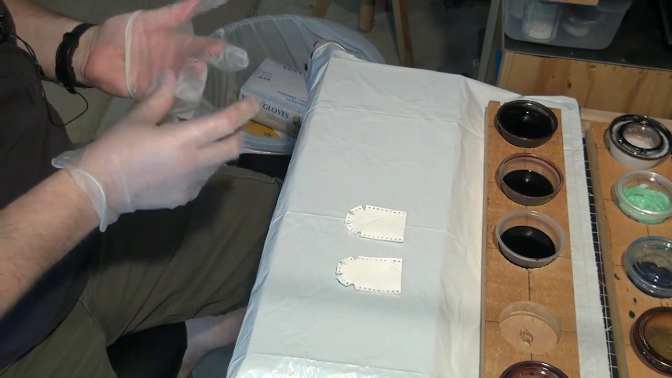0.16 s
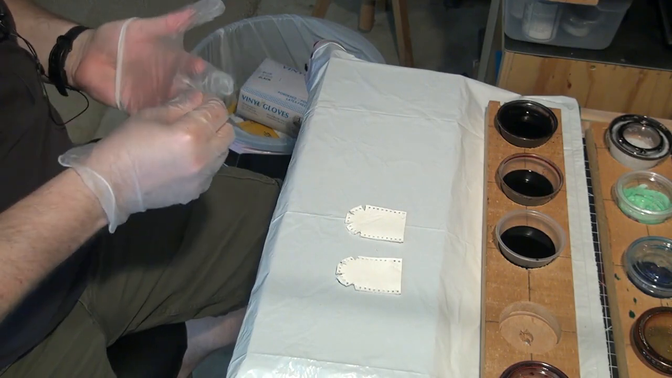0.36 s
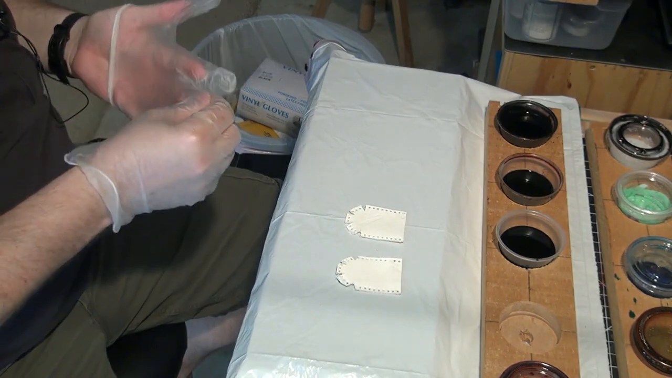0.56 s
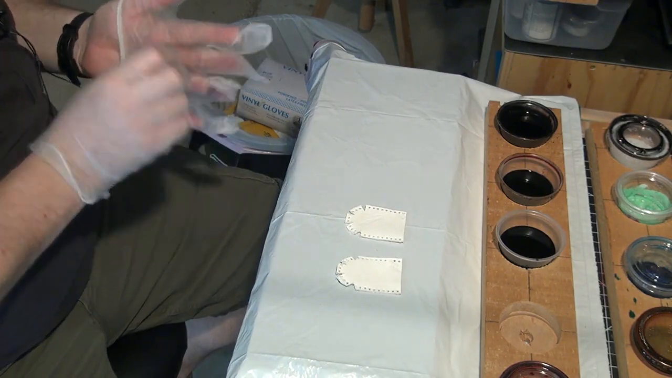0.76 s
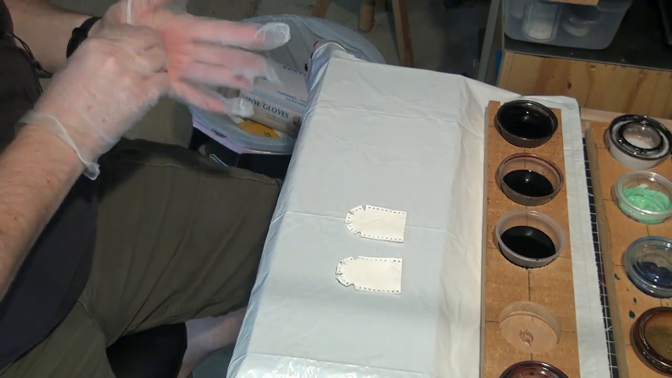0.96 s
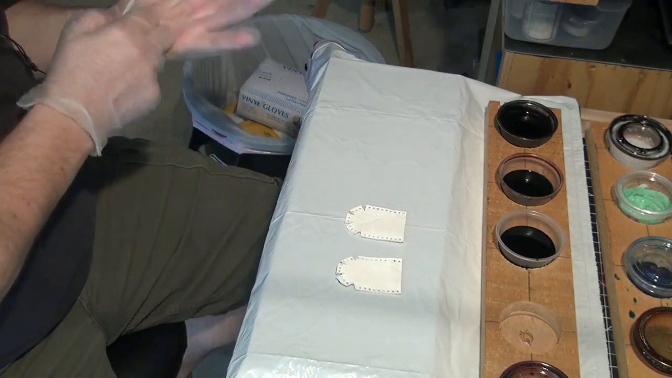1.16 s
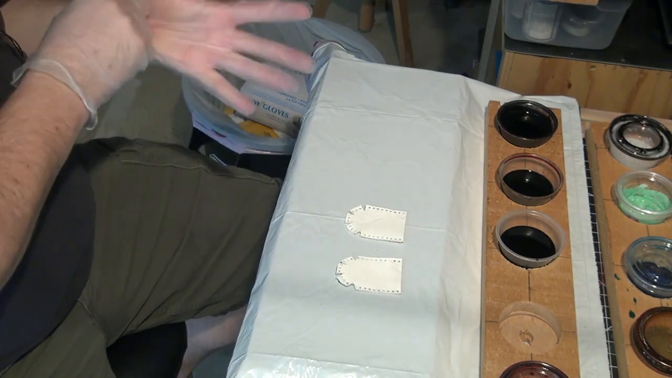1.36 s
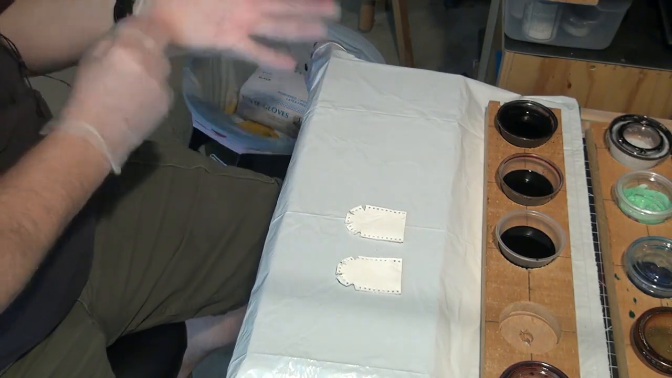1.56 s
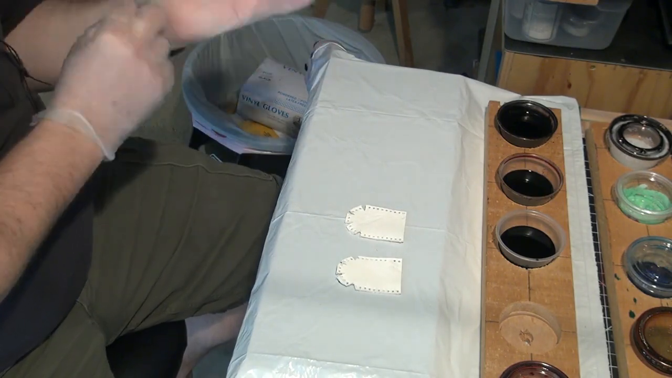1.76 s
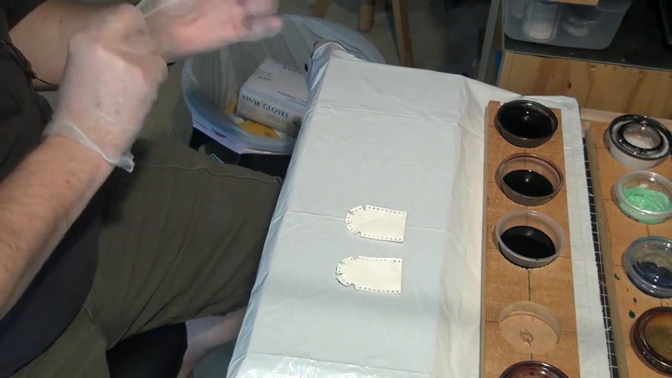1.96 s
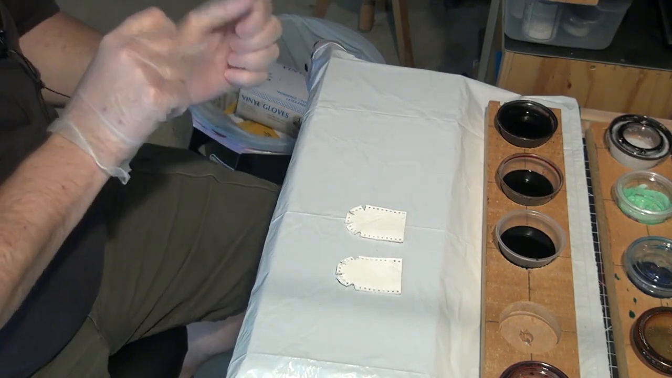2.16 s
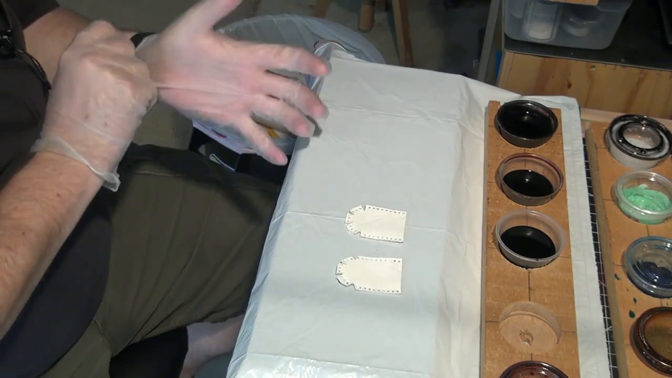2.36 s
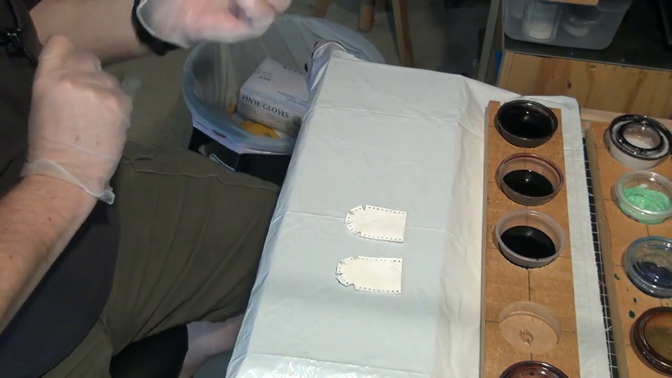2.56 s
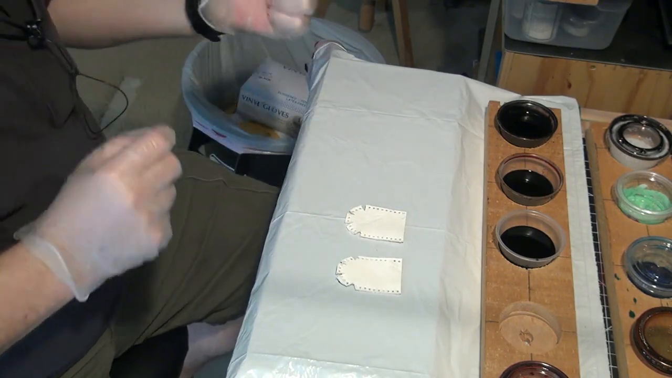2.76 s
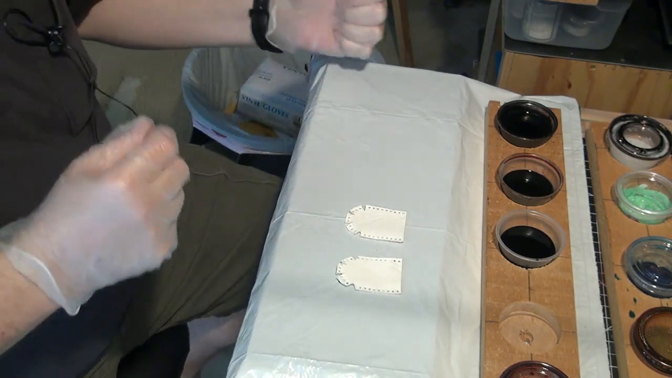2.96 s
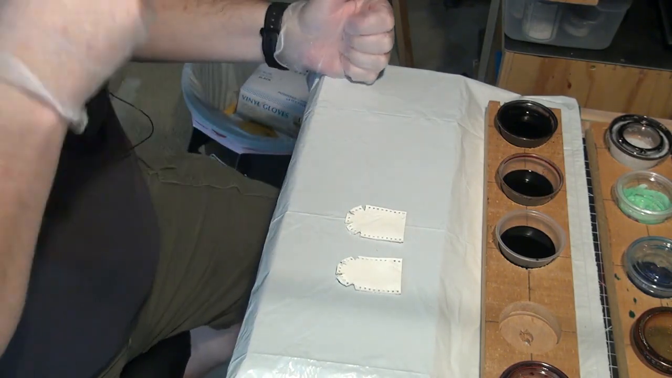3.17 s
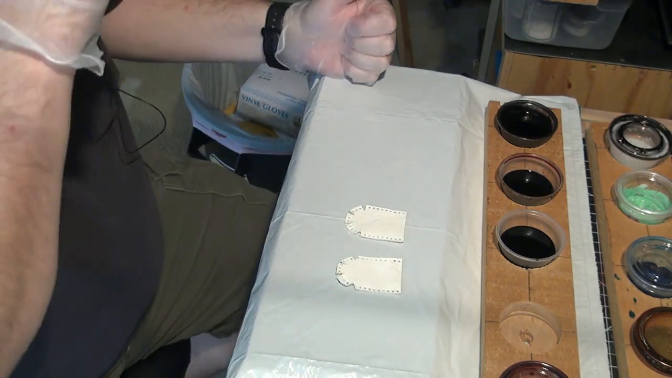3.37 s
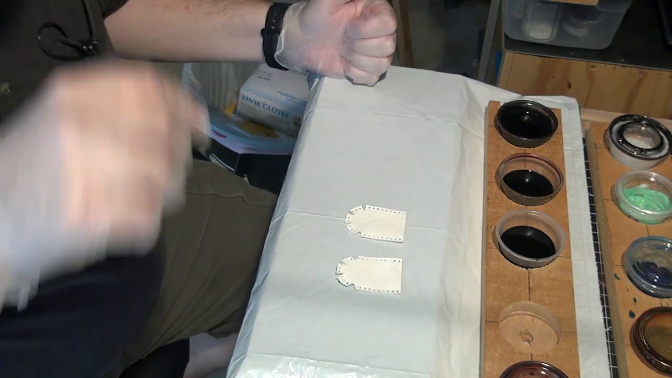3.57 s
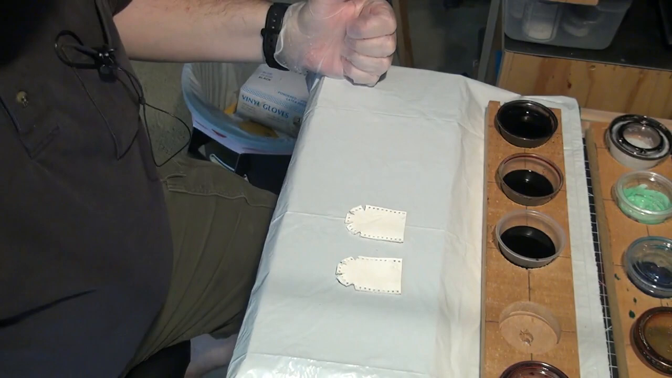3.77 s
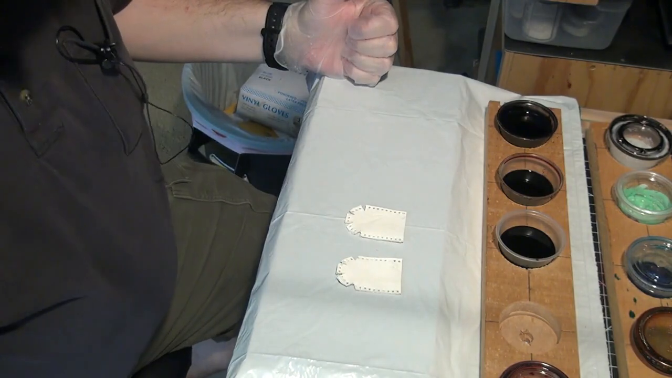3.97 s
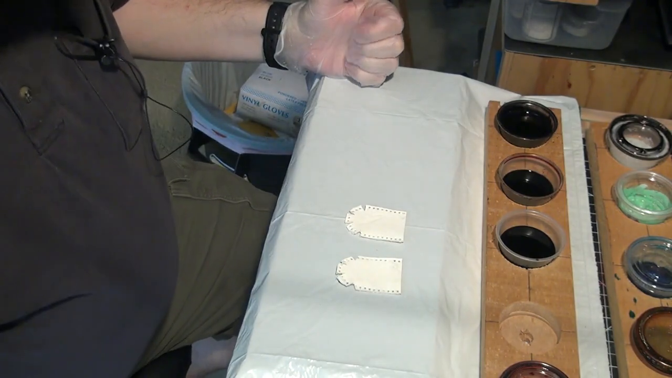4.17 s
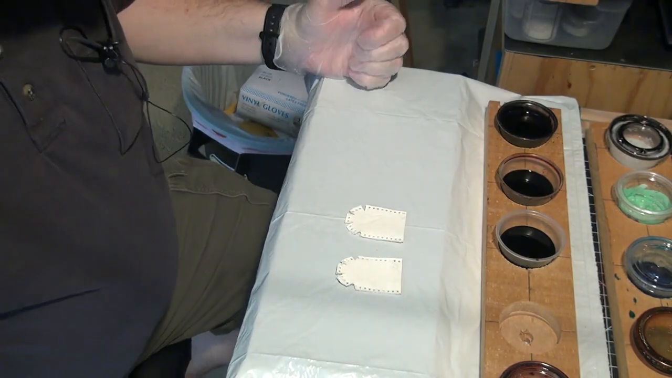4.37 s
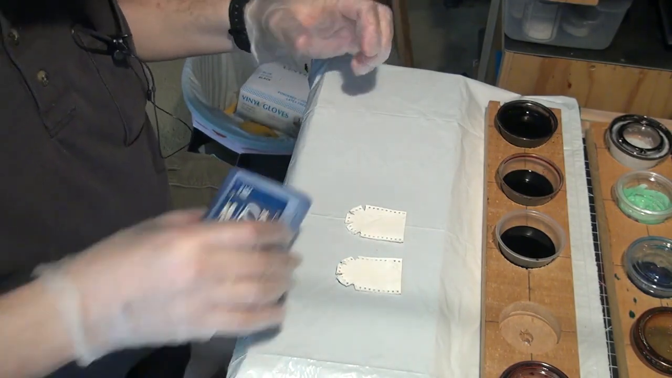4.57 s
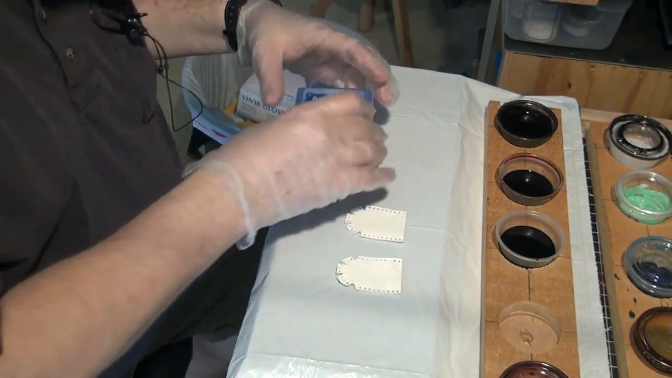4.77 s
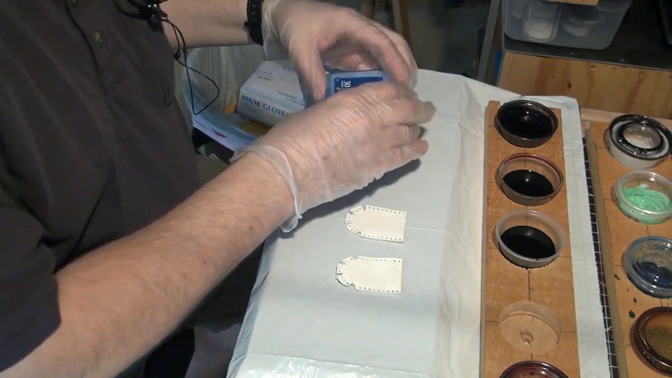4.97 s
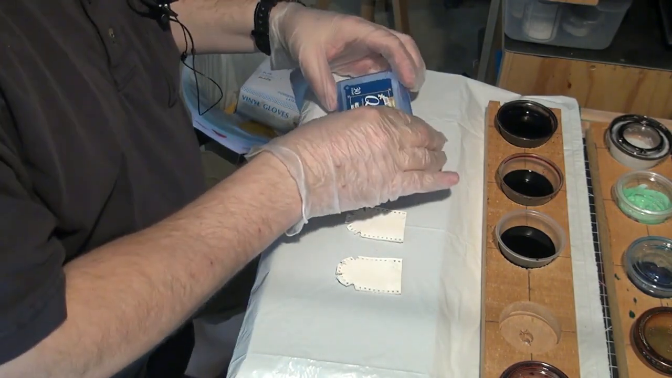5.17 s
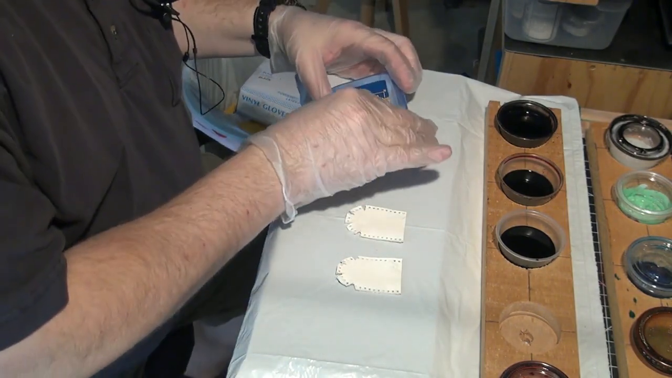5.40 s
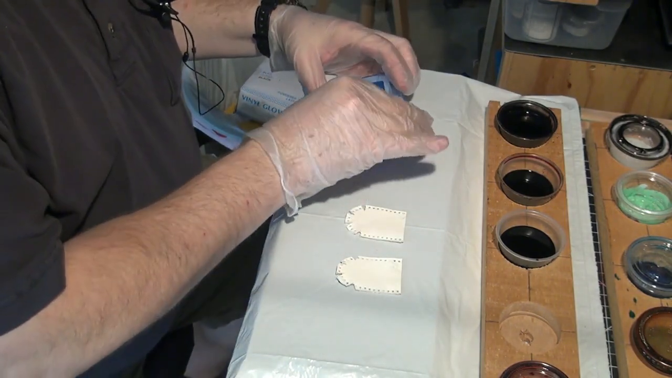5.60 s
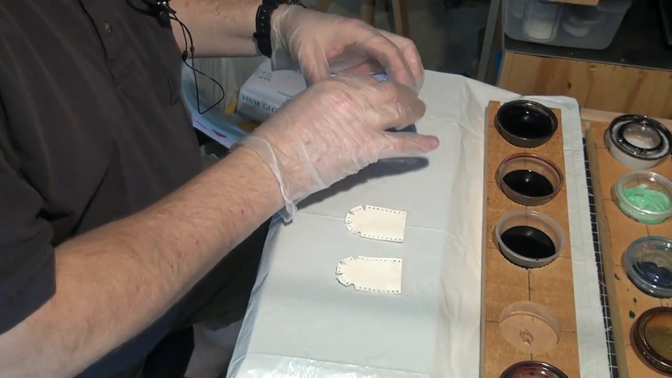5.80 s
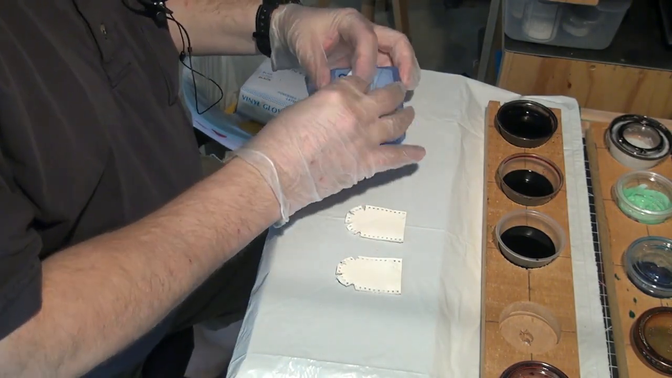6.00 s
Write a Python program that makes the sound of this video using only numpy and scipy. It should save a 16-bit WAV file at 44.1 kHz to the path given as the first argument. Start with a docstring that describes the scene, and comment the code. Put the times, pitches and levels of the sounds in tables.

```python
"""In a quiet workshop, at a bench close to a small microphone, thin vinyl gloves are pulled on: sliding
friction makes filtered noise, slips swell it, and creases and the snapping cuff excite short resonances.
A small carton is then fetched, set down, rattled, knocks a glass jar and has its lid cracked open: blows
strike decaying modes and add bursts of noise. A short room tail and the shop's steady noise and hum,
shaped random noise, lie around it."""
import sys
import numpy as np
from scipy import signal
from scipy.fft import rfft, irfft
from scipy.io import wavfile
from scipy.ndimage import uniform_filter1d

SR = 44100
rng = np.random.default_rng(int(sys.argv[2]) if len(sys.argv) > 2 else 0)


def decibels_to_gain(level_db):
    """Convert a level in decibels to a linear amplitude gain (20 dB per decade)."""
    exponent = np.asarray(level_db, float) / 20
    return 10 ** exponent


def wav_record(signal):
    """Record a signal, one row per channel, as 16-bit PCM in the file named by sys.argv[1]."""
    frames = np.transpose(np.atleast_2d(signal))
    bounded = np.clip(frames, -1, 1)
    # unit amplitude maps onto the largest positive 16-bit level
    quanta = np.round(bounded * 32767).astype(np.int16)
    wavfile.write(sys.argv[1], SR, quanta)


N = 266364  # length [samples]


def colour(x, points):
    """Minimum-phase filtering: a folded cepstrum makes (frequency [Hz], gain [dB]) points causal."""
    hz, db = np.transpose(points)
    log_hz = np.log(np.linspace(1, SR / 2, 2049))
    cepstrum = irfft(np.interp(log_hz, np.log(hz), db) * np.log(10) / 20)
    cepstrum[1:2048] *= 2
    cepstrum[2049:] = 0
    response = irfft(np.exp(rfft(cepstrum)))[:2048]
    return signal.fftconvolve(x, response)[:len(x)]


def unit(x):
    """Normalisation: equal power, rms 1."""
    return x / np.sqrt(np.mean(x ** 2))


def peak(x, db):
    """Normalisation: the largest excursion is set to a peak level."""
    return x * decibels_to_gain(db) / np.abs(x).max()


def band(x, hz, width_hz):
    """Resonance: a second-order peak with gain 1 at its centre."""
    centre, q = min(hz, 0.45 * SR), max(hz / width_hz, 0.3)
    return signal.lfilter(*signal.iirpeak(centre, q, fs=SR), x)


def ring(x, hz, t60):
    """Free vibration: a mode driven by x decays by 60 dB in t60 seconds."""
    pole = np.exp(2j * np.pi * hz / SR - np.log(1000) / (t60 * SR))
    return signal.lfilter([1], [1, -pole], x).imag


def walk(rate):
    """Slow fluctuation: random levels of rms 1, held 1 / rate seconds and slewed twice."""
    hold = int(SR / rate)
    levels = np.repeat(rng.standard_normal(N // hold + 1), hold)
    return unit(uniform_filter1d(uniform_filter1d(levels, hold), hold)[:N])


def add(out, s, x):
    """Superposition: mix x into out from time s [s] on."""
    i = max(int(s * SR), 0)
    out[i:i + len(x)] += x[:N - i]


# film and sleeves sliding, slack film dull and stretched film bright:
# (time [s], level [dB], tautness [dB])
SLIDING = [(0, -46, 0.5), (0.08, -62.5, -2.5), (0.25, -59.5, 0), (0.33, -54.5, -1), (0.5, -53, -9.5),
           (0.64, -50, -2), (0.72, -57.5, -3.5), (0.82, -60.5, -1.5), (1.0, -55, 6.5), (1.051, -42.5, 5),
           (1.14, -44.5, -3), (1.4, -42.5, 2), (1.62, -45, -2), (1.74, -47.5, 0), (1.82, -41, 3),
           (1.95, -48.5, -3), (2.15, -53.5, -2.5), (2.47, -47.5, 1.5), (2.7, -52, -0.5), (2.8, -58.5, -4),
           (3.35, -65.5, -1), (4.55, -60.5, -0.5), (4.8, -55.5, -1.5), (5.3, -61.5, -1.5),
           (5.68, -65, -0.5), (5.95, -60, 7), (6.04, -55.5, -8)]


def hands():
    """Slow control of friction: level and tautness interpolated at every sample."""
    s, level_db, taut_db = np.transpose(SLIDING)
    t = np.arange(N) / SR
    return np.interp(t, s, level_db), np.interp(t, s, taut_db)


# spectrum of the rubbed film: (frequency [Hz], density [dB per Hz])
FILM_SPECTRUM = [(120, -41.5), (200, -3.5), (298, 5), (339, 2.5), (687, 2), (1140, 1), (1610, 8), (2230, 4),
                 (3780, 4.5), (6760, -3), (8260, -10), (9720, -7.5), (15300, -21.5)]


def crinkle(rate, puff_s, folds_db):
    """Friction noise plus shot noise: random folds, mostly tiny, each a short decaying puff."""
    sizes = decibels_to_gain(2.35 * np.minimum(rng.exponential(size=N), 3.5))
    folds = (rng.random(N) < rate / SR) * sizes
    decay = signal.lfilter([1], [1, -np.exp(-1 / (puff_s * SR))], folds)
    puffs = decay * rng.standard_normal(N)
    friction = rng.standard_normal(N) * decibels_to_gain(3.6 * walk(40))
    return colour(friction + decibels_to_gain(folds_db) * unit(puffs), FILM_SPECTRUM)


def slide():
    """Tension and spectrum: large slack folds sound dull, fine ones bright; stretching favours bright."""
    level_db, taut_db = hands()
    low = signal.butter(2, 1500, fs=SR, output="sos")
    high = signal.butter(2, 7000, "high", fs=SR, output="sos")
    slack = crinkle(150, 0.003, 1.3)
    fine = crinkle(500, 0.0012, -3.4)
    dull = signal.sosfiltfilt(low, slack)
    bright = signal.sosfiltfilt(high, fine)
    middle = fine - signal.sosfiltfilt(low, fine) - bright
    # parts against the middle [dB], with their change per dB of tautness
    dull_gain = decibels_to_gain(-1 - 0.93 * taut_db)
    bright_gain = decibels_to_gain(0.5 + 1.0 * taut_db)
    return decibels_to_gain(level_db) * (dull_gain * unit(dull) + unit(middle) + bright_gain * unit(bright))


# quick slips of film or sleeve, the length being the Gaussian's deviation:
# (time [s], level [dB], length [s], centre [Hz])
QUICK_SLIPS = [(0.047, -39, 0.0083, 7350), (0.285, -36, 0.0082, 6750), (0.734, -39.5, 0.013, 7140),
               (.97, -38, 0.0084, 7440), (1.84, -29, 0.0085, 8100), (2.095, -41.5, 0.019, 8100),
               (2.305, -47, 0.021, 6000), (2.441, -35, 0.007, 3840), (2.554, -33, 0.0025, 3760),
               (2.989, -50, 0.0082, 1970), (3.12, -49.5, .016, 4970), (3.781, -50, 0.028, 6030),
               (4.253, -49.5, 0.041, 6240), (4.986, -46, 0.041, 8100), (5.604, -53.5, 0.016, 7000)]


def slips():
    """Transient friction: broad resonant noise under a Gaussian swell."""
    out = np.zeros(N)
    for s, db, length, hz in QUICK_SLIPS:
        t = np.arange(-4 * length, 4 * length, 1 / SR)
        air = rng.standard_normal(len(t))
        hiss = band(air, hz, 1.1 * hz) + decibels_to_gain(-13.5) * unit(colour(air, FILM_SPECTRUM))
        swell = np.exp(-0.5 * (t / length) ** 2)
        add(out, s + t[0], decibels_to_gain(db) * swell * unit(hiss))
    return out


def small_creases():
    """Random events: lesser folds pop at chance moments, their peaks following the sliding level."""
    count, over_db, scatter_db = 320, 8, 3.5  # mean peak over the sliding level, and its spread
    pitch_hz, thump_db = 2830, -12
    level_db, _ = hands()
    events = []
    for u, (a, b, c) in zip(rng.random(count), rng.standard_normal((count, 3))):
        peak_db = level_db[int(u * N)] + over_db + scatter_db * a
        events.append((u * N / SR, peak_db, pitch_hz * decibels_to_gain(2.3 * b), thump_db + 4 * c))
    return events


# clearest creases, in the film and at last in the lid:
# (time [s], tick peak [dB], pitch [Hz], thump over tick [dB])
CLEAR_CREASES = [(0.499, -28, 2100, -7), (0.5248, -17.5, 2150, -9), (0.5627, -25, 2400, -9.5),
                 (0.7775, -25.5, 3050, -26), (1.1217, -20, 4000, -14), (1.2244, -19, 4230, -12),
                 (1.2874, -25, 4300, -16), (1.3441, -22, 3740, -10.5), (1.6316, -24.5, 3640, -6),
                 (1.6634, -17.5, 4540, -7), (1.6726, -23.5, 4080, 0), (1.6843, -16.5, 2950, -4.5),
                 (1.7091, -23, 3410, -11), (1.729, -24, 4100, -9), (1.7531, -23, 4050, -3.5),
                 (1.816, -21.5, 2400, 6.5), (1.8687, -20.5, 4900, -10.5), (1.9359, -27, 2630, -11),
                 (2.7513, -27, 4000, -16), (2.753, -29.5, 1600, -14), (2.7745, -30.5, 6500, -15),
                 (2.9782, -32.5, 1840, -4.5), (3.27, -35, 7500, -18), (3.3297, -35.5, 3700, -19),
                 (3.376, -32.5, 8000, -20), (3.89, -39, 4100, -9), (5.7238, -28.5, 12450, -15),
                 (5.7466, -24.5, 7580, -3), (5.7562, -21, 6870, -8), (5.767, -8, 9000, -16.5),
                 (5.771, -10, 6870, -10.5), (5.7971, -12, 5250, -6), (5.9077, -27, 7050, -13)]


def creases():
    """Buckling: a fold flips with a pitched tick and pushes the resonant air pocket under the film."""
    out, t = np.zeros(N), np.arange(1000) / SR
    for s, db, hz, thump_db in [*CLEAR_CREASES, *small_creases()]:
        flip = rng.standard_normal(len(t)) * t * np.exp(-t / 0.00029)
        tick = band(band(flip, hz, hz), hz, hz)
        pocket_hz = 950 * decibels_to_gain(2.06 * rng.standard_normal())
        pocket = ring(flip, pocket_hz, 0.012)
        add(out, s, peak(tick, db) + peak(pocket, db + thump_db))
    return out


# resonances of the snapping cuff, each passed twice: (centre [Hz], width per pass [Hz], peak [dB])
CUFF = [(6250, 850, -5), (10500, 2500, -7), (3840, 700, -18.5)]


def snap():
    """Release of elastic energy: the stretched cuff whips back, a millisecond burst in resonances."""
    snap_s, length_s = 1.8348, 0.0011  # the length is the Gaussian's deviation
    t = np.arange(N) / SR - snap_s
    burst = rng.standard_normal(N) * np.exp(-0.5 * (t / length_s) ** 2)
    return sum(peak(band(band(burst, hz, width), hz, width), db) for hz, width, db in CUFF)


# modes of the carton: (frequency [Hz], gain [dB], t60 [s])
CARTON_MODES = [(346, -4.5, 0.068), (590, -1.5, 0.032), (704, 2.5, 0.019), (889, 2.5, 0.016),
                (1050, 3.5, 0.017), (1290, 3, 0.016), (1621, 1.5, 0.033), (2053, 13.5, 0.0079),
                (3040, 17, 0.038)]
# blows on carton and bench: (time [s], body peak [dB], hardness [Hz], crack over body [dB])
BLOWS = [(1.8307, -19.5, 1230, 4), (2.198, -21.5, 985, -7), (2.2292, -33.5, 614, 2),
         (2.8828, -39.5, 350, -21), (3.311, -41.5, 537, -17), (3.555, -48, 515, 4.5),
         (3.6267, -44.5, 393, -13), (3.703, -41.5, 590, -0.5), (3.7337, -33, 352, -20),
         (3.7677, -38.5, 407, 3), (3.7898, -36.5, 447, -3), (3.8104, -30, 480, -32), (3.99, -23, 770, -3),
         (4.052, -39, 710, -17), (4.124, -35, 796, -4), (4.669, -31, 350, -21), (4.689, -34, 353, -14),
         (4.7285, -20.5, 760, -32), (4.7984, -16.5, 980, -4), (4.8217, -30, 680, -5),
         (4.9554, -25.5, 1050, 0), (4.9778, -24.5, 1360, 0), (5.007, -25.5, 810, -0.5),
         (5.1252, -20.5, 1320, 0.5), (5.141, -20.5, 755, -2), (5.182, -8.5, 1005, -4),
         (5.7412, -29.5, 1040, 6.5), (5.7631, -26, 1290, 13.5), (5.7873, -12.5, 1030, 4.5),
         (5.8072, -16.5, 680, 9.5), (5.8171, -13, 740, 3.5), (5.8383, -19.5, 910, 3.5),
         (5.8544, -6, 700, 5), (5.869, -10.5, 1010, 4.5), (5.8834, -17, 815, 11), (5.9179, -10, 820, 6)]
# spectrum of a crack: (frequency [Hz], density [dB per Hz])
CRACK_SPECTRUM = [(880, -19), (1500, -4.5), (4080, -5.5), (4550, -3.5), (5440, -4.5), (6180, -3.5),
                  (8490, -2.5), (11900, -5), (14500, -8), (16500, -24)]


def carton_body(t, hardness_hz):
    """Modal excitation: place sets the mode weights, contact hardness picks the modes that speak."""
    press_s = 4 / hardness_hz  # soft, low blows press longer
    push = 0.13 * (700 / hardness_hz) * rng.standard_normal(len(t)) * np.exp(-t / press_s)
    push[int(0.3 * SR / hardness_hz)] = 1  # the contact peaks a moment after it starts
    reach = 1.5 if hardness_hz > 600 else 4.5  # hard blows still wake the high modes; soft ones barely do
    body = np.zeros(len(t))
    for hz, gain_db, t60 in CARTON_MODES:
        a, b = rng.standard_normal(2)  # every blow lands elsewhere
        distance = np.log2(hz / hardness_hz) ** 2  # squared octaves
        if hz > hardness_hz:
            distance = min(distance, reach)
        weight = decibels_to_gain(gain_db + 1.6 * a - 12 * distance)
        body += weight * ring(push, hz * (1 + 0.041 * b), t60)
    return band(body, hardness_hz, 1.97 * hardness_hz)  # the contact patch rounds off the blow's edge


def fibre_crack(t, crack_db):
    """Fracture noise: a sharp burst, then a tail as fibres let go in millisecond bursts."""
    unevenness = uniform_filter1d(rng.standard_normal(len(t)), size=40) * np.sqrt(40)
    grit = decibels_to_gain(4.5 * unevenness)
    envelope = np.exp(-t / 0.00045) + 0.37 * grit * np.exp(-t / 0.0098)
    crack = colour(rng.standard_normal(len(t)) * envelope, CRACK_SPECTRUM)
    top_hz = np.clip(9000 * decibels_to_gain(2.7 * crack_db), 2000, 19000)  # a strong crack is also a bright one
    return signal.lfilter(*signal.butter(2, top_hz, fs=SR), crack)


def carton():
    """Impact: each blow sounds the box's modes together with a crack of its fibres."""
    out, t = np.zeros(N), np.arange(8000) / SR
    for s, db, hardness_hz, crack_db in BLOWS:
        body = carton_body(t, hardness_hz)
        crack = fibre_crack(t, crack_db)
        add(out, s, peak(body, db) + peak(crack, db + crack_db))
    return out


# contents rattling and the carton scraping along the cloth: (time [s], envelope [dB])
RATTLING = [(4.72, -52), (4.75, -32), (4.79, -30.5), (4.82, -20.5), (4.93, -30), (4.98, -21.5), (5.08, -38),
            (5.11, -53)]
# modes of what rattles inside: (frequency [Hz], gain [dB], t60 [s])
CONTENT_MODES = [(680, -0.5, 0.014), (1400, -2, 0.01), (1990, -8, .011)]


def rattle():
    """Repeated impact: contents bounce some eighty times a second, unevenly, over a faint scrape."""
    s, db = np.transpose(RATTLING)
    t = np.arange(N) / SR
    chance = rng.standard_normal((40, 2))
    bounce_s = s[0] + np.cumsum(decibels_to_gain(4.5 * chance[:, 0]) / 85)
    taps = 0.037 * rng.standard_normal(N)  # the scrape
    taps[(bounce_s * SR).astype(int)] += decibels_to_gain(2.3 * chance[:, 1])
    body = sum(decibels_to_gain(gain_db) * band(ring(taps, hz, t60), hz, hz) for hz, gain_db, t60 in CONTENT_MODES)
    body = body * (t > s[0]) * (t < s[-1])
    return peak(body, 0) * decibels_to_gain(np.interp(t, s, db))


# modes of the glass jar: (frequency [Hz], level [dB], t60 [s])
JAR_MODES = [(2180, -37.5, 0.51), (4150, -56.5, 0.71), (6900, -56, 0.72)]


def jar():
    """Impulse response: a glass jar rings once when the carton touches it."""
    tap_s = 5.182
    tap = np.zeros(N)
    tap[int(tap_s * SR)] = 1
    return sum(decibels_to_gain(db) * ring(tap, hz, t60) for hz, db, t60 in JAR_MODES)


def room(x):
    """Reverberation: convolution with a short, dull decaying tail, nearly the same in both channels."""
    t60_s, level_db, treble_limit_hz = 0.23, -14.5, 3000
    t = np.arange(SR // 2) / SR
    onset = np.minimum(t / 0.0017, 1)
    tails = rng.standard_normal((2, len(t))) * decibels_to_gain(-60 * t / t60_s) * onset
    tails = signal.lfilter(*signal.butter(1, treble_limit_hz, fs=SR), tails)
    mid, side = (signal.fftconvolve(x, h)[:N] * decibels_to_gain(level_db) / np.linalg.norm(h) for h in tails)
    return np.array([mid + 0.17 * side, mid - 0.042 * side])


# spectrum of the shop's broad noise: (frequency [Hz], density [dB per Hz])
SHOP_SPECTRUM = [(15, -70), (25, -4), (69, 0.5), (119, 2.5), (198, -1), (288, -6.5), (366, -10.5),
                 (492, -10.5), (889, -15), (1740, -18), (2400, -19), (3220, -26), (5090, -28),
                 (6840, -21.5), (15300, -27.5)]
# stereo spread of that noise: (frequency [Hz], side minus mid [dB])
SHOP_SPREAD = [(60, -17), (110, -10), (200, -14.5), (380, -8.5), (700, -7), (1290, -13), (2380, -14),
               (4400, -7), (8120, -15), (15000, -21)]
# hum and thin high hiss, each band passed twice: (centre [Hz], width per pass [Hz], level [dB])
HUM_BANDS = [(55.8, 17, -67), (112.5, 25.5, -62), (6890, 560, -67.5)]


def shop():
    """Stationary noise: steady air and machinery as broad noise, a wavering hum and a thin high hiss."""
    mid = colour(rng.standard_normal(N), SHOP_SPECTRUM)
    side = colour(colour(rng.standard_normal(N), SHOP_SPECTRUM), SHOP_SPREAD)
    swell = decibels_to_gain(1.2 * walk(2))
    air = decibels_to_gain(-56) * swell / np.std(mid) * np.array([mid + side, mid - side])
    for hz, width, db in HUM_BANDS:
        both, apart = (unit(band(band(rng.standard_normal(N), hz, width), hz, width)) for _ in range(2))
        waver = decibels_to_gain(1.8 * walk(6))
        air += decibels_to_gain(db) * waver * (both + 0.095 * apart * np.array([[1], [-1]]))
    return air


def scene():
    """Stereo difference: hands lean left of centre; treble reaches two microphone ports differently."""
    near = slide() + slips() + creases() + snap() + carton() + rattle() + jar()
    bass_cut = signal.butter(4, 260, "high", fs=SR, output="sos")
    near = signal.sosfilt(bass_cut, near)  # small things make no bass
    lean = 0.13 * band(near, 640, 1240)
    ports = 0.2 * np.roll(band(band(near, 8200, 5200), 8200, 5200), 20)  # delayed 20 samples
    return near + (lean + ports) * np.array([[1], [-1]]) + room(near) + shop()


def low_pass(x):
    """Removes everything above the highest recorded frequency."""
    return signal.sosfilt(signal.butter(12, 17160, fs=SR, output="sos"), x)


def record(dry):
    """Soft saturation: the input stage rounds the loudest cracks."""
    mix = 1.27 * np.tanh(dry / 1.333)
    return low_pass(mix)


dry = scene()
out = record(dry)
wav_record(out)
```